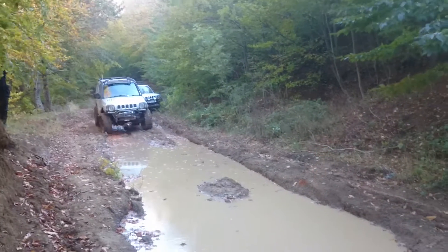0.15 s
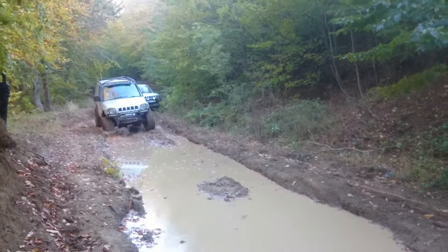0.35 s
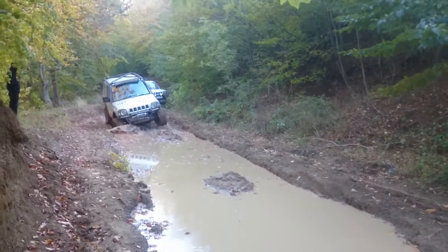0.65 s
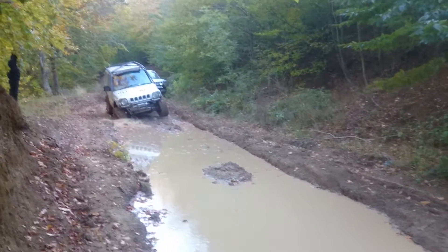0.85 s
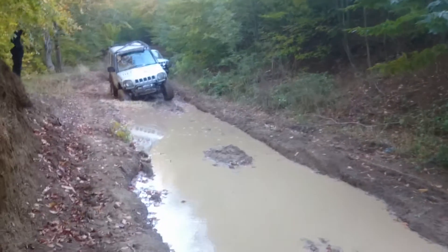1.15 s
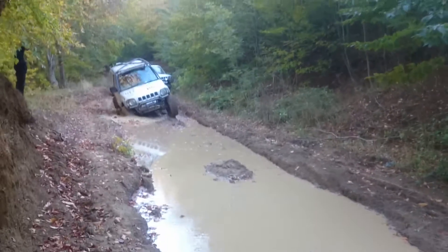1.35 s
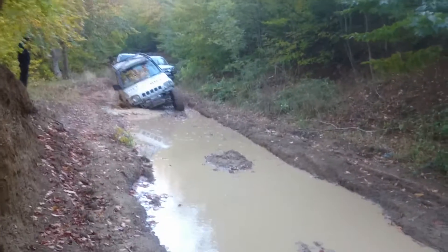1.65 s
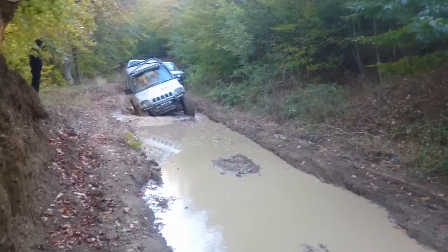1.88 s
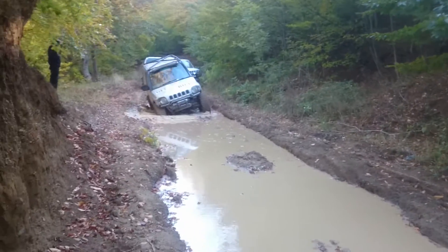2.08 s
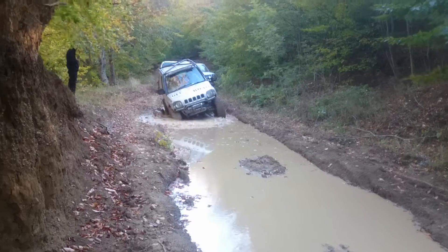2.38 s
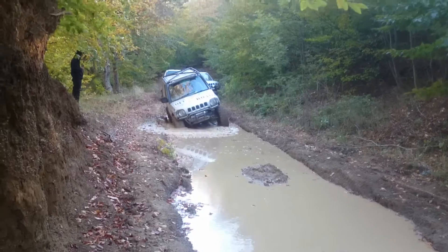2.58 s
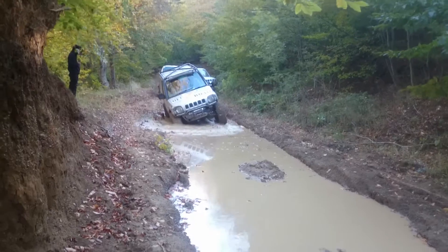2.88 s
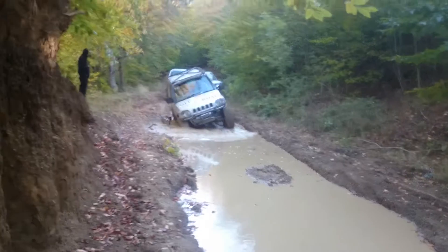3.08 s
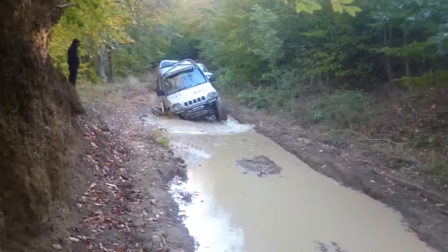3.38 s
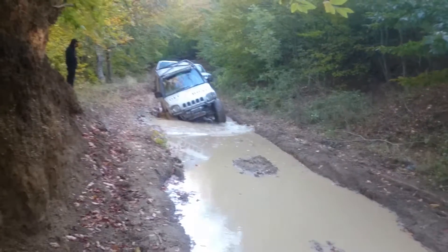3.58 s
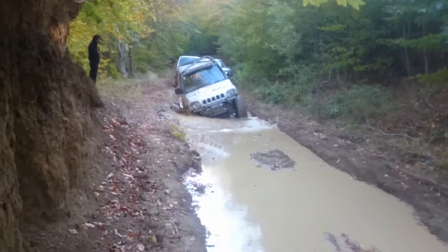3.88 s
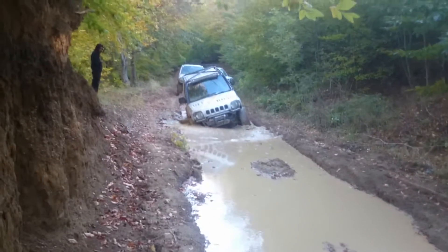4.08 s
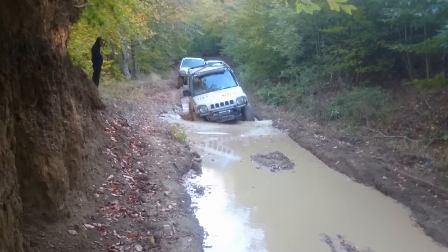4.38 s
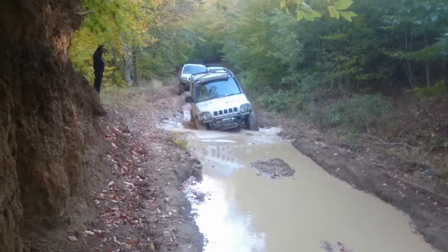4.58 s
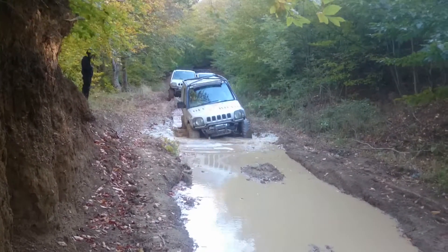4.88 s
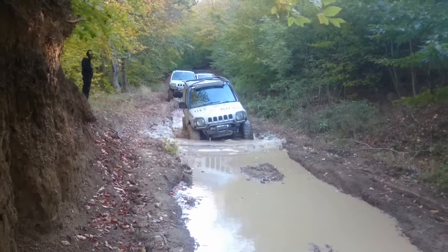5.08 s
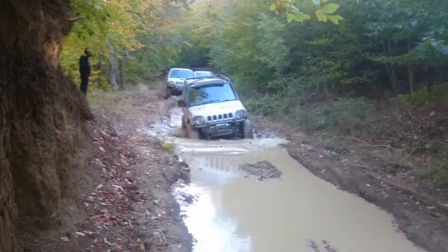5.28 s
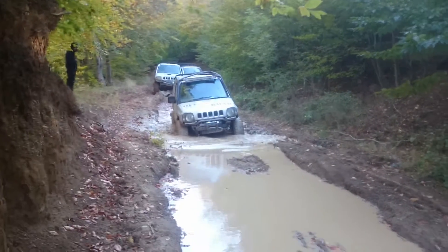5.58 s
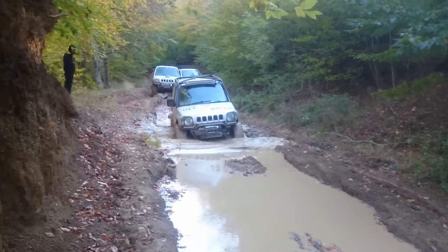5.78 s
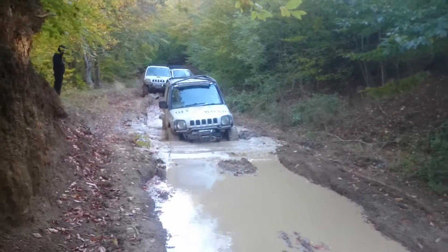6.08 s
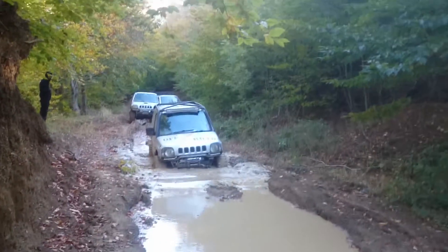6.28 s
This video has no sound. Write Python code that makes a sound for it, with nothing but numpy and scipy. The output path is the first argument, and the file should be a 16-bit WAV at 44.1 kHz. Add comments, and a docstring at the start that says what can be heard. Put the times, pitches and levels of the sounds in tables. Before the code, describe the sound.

Brittle leaves crunch under a foot close to the microphone as an off-road vehicle burbles farther along a woodland track. Its engine revs once, sinks, then climbs again and settles into a deep, throbbing drone. The tyres churn through a deep puddle, with gulping water, hissing spray, ticking drops and occasional knocks from the ruts. The sloshing grows a little louder towards the end.

```python
"""An exhaust booms on a forest track: one blip of the throttle, then a steady pull as a small
four-wheel drive creeps into a deep muddy puddle. Its firing pulses slide through the resonances of
the pipe, water sloshes and sprays round the tyres, and the chassis knocks in the ruts.
Early on, dry leaves crunch underfoot right beside the stereo microphone."""
import sys
import numpy as np
from scipy import signal
from scipy.fft import rfft, irfft, next_fast_len
from scipy.io import wavfile
from scipy.ndimage import uniform_filter1d

SR = 44100
rng = np.random.default_rng(int(sys.argv[2]) if len(sys.argv) > 2 else 0)


def inscribe(sig):
    """Save sig as 16-bit PCM at rate SR to the path in sys.argv[1].

    A 1-D sig is mono; a 2-D sig holds one channel per row.
    Samples are clipped to [-1, 1] before scaling.
    """
    pcm = np.round(np.clip(np.atleast_2d(sig).T, -1, 1) * 32767)
    wavfile.write(sys.argv[1], SR, pcm.astype(np.int16))


N = 284445
TIME = np.arange(N) / SR

# response of the exhaust pipe and silencer: (frequency [Hz], gain [dB])
PIPE_RESPONSE = [(25, -48), (55, -9), (90, -7.5), (122, -4), (150, -7), (195, -13), (235, -12), (305, -18),
                 (348, -47), (400, -26), (520, -51), (800, -73)]


def from_db(db):
    return 10 ** (np.asarray(db) / 20)


def rms_one(x):
    return x / np.sqrt(np.mean(x ** 2) + 1e-20)


def hiss():
    return rng.standard_normal((2, N))


def in_time(rows):
    """Each column of a curve, sample by sample."""
    times, *columns = np.transpose(rows)
    return [np.interp(TIME, times, column) for column in columns]


def held(moves, lag_s):
    """Each column holds from one move to the next, softened by two lags in series."""
    times, *columns = np.transpose(moves)
    latest = np.maximum(np.searchsorted(times, TIME, side="right") - 1, 0)
    r = np.exp(-1 / (lag_s * SR))
    return [c[0] + signal.lfilter([(1 - r) ** 2], [1, -2 * r, r * r], c[latest] - c[0]) for c in columns]


def swells(events):
    """An envelope that rises and falls smoothly round each event."""
    return sum(from_db(db) * np.exp(-((TIME - s) / half_s) ** 2) for s, half_s, db in events)


def push(start_s, rise_s, decay_s):
    """An envelope with a straight rise to 1 and a dying tail."""
    age = TIME - start_s
    return np.clip(age / rise_s, 0, 1) * np.exp(-np.maximum(age - rise_s, 0) / decay_s)


def bursts(events, decay_s):
    """An envelope that jumps at each event and dies away."""
    jumps = np.zeros(N)
    for s, db in events:
        jumps[round(s * SR)] += from_db(db)
    return signal.lfilter([1], [1, -np.exp(-1 / (decay_s * SR))], jumps + 1e-18)


def drift(rate_hz):
    """A slow random wander with a spread of 1."""
    hop = 40
    r = np.exp(-2 * np.pi * rate_hz * hop / SR)
    slow = signal.lfilter([1], [1, -2 * r, r * r], rng.standard_normal(N // hop + 2002))[2000:]
    return np.interp(np.arange(N) / hop, np.arange(len(slow)), rms_one(slow))


def grains(per_s, spread_db):
    """Two rows of random clicks of unequal size, at the same moments."""
    sizes = from_db(spread_db * np.minimum(rng.exponential(1, N), 4))
    hits = rng.random(N) < per_s / SR
    return rms_one(hits * sizes * hiss())


def at_hz(spectrum, hz):
    """Reads a spectrum on a log-frequency axis."""
    points_hz, values = np.transpose(spectrum)
    return np.interp(np.log(hz + 1e-3), np.log(points_hz), values)


def colour(x, spectrum):
    """Filters by a spectrum of (frequency [Hz], gain [dB])."""
    size = next_fast_len(N + 8192)
    hz = np.arange(size // 2 + 1) * SR / size
    return irfft(rfft(x, size) * from_db(at_hz(spectrum, hz)), size)[..., :N]


def resonate(x, hz, width_hz):
    """One resonance with a gain of 1 at its top."""
    r = np.exp(-np.pi * width_hz / SR)
    feedback = [1, -2 * r * np.cos(2 * np.pi * hz / SR), r * r]
    return signal.lfilter(np.array([1, 0, -1]) * (1 - r * r) / 2, feedback, x + 1e-18)


def spread(pair, spectrum):
    """Turns two unrelated signals into coloured stereo, alike in the bass and diffuse in the treble."""
    # likeness at the two microphones: (frequency [Hz], correlation [0-1])
    likeness = [(100, 0.6), (600, 0.96), (1100, 0.64), (2000, 0.0039), (5000, 0.0071), (16000, 0.027)]
    mid = colour(pair[0], [(hz, 10 * np.log10(1 + alike)) for hz, alike in likeness])
    side = colour(pair[1], [(hz, 10 * np.log10(1 - alike)) for hz, alike in likeness])
    return rms_one(colour(np.array([mid + side, mid - side]), spectrum))


def valve_clatter(firings):
    """The valve gear rattles the block once a firing."""
    # modes of the engine block and cover: (frequency [Hz], width [Hz], gain [dB])
    block_modes = [(1173, 220, -2.5), (1630, 63, 4.5), (2040, 103, 4), (3428, 33, 8.5)]
    # strength of the clatter: (time [s], level [dB])
    levels = [(0, -77), (1, -51.5), (2.8, -49), (6.45, -55.5)]
    rattle = hiss() * (1 + np.cos(2 * np.pi * firings))
    ringing = sum(from_db(db) * resonate(rattle, hz, width) for hz, width, db in block_modes)
    return from_db(in_time(levels)[0]) * rms_one(ringing)


def tyre_scrub():
    """Grit under a slipping tyre rasps in a narrow band."""
    # tyre slips: (middle [s], half length [s], level [dB])
    slips = [(.28, 0.068, -41.5), (.92, .13, -45), (3.95, 0.23, -46.5)]
    flutter = from_db(2 * drift(20))
    return swells(slips) * flutter * rms_one(resonate(hiss(), hz=2030, width_hz=480))


def ticks_and_splats():
    """Drops and grit land with a sharp tick; splats are longer and duller."""
    # flung drops and grit: (time [s], relative level [dB])
    drops = [(0.0782, -32), (1.4444, -28.5), (1.7851, -26), (2.1038, -28.5), (2.139, -29.5), (2.8992, -33),
             (3.2748, -33), (3.7295, -38), (6.3594, -28)]
    # muddy water landing: (time [s], relative level [dB])
    mud = [(3.865, -42), (6.139, -34), (6.167, -37), (6.179, -41), (6.288, -34.5)]
    tick_noise = spread(hiss(), [(800, -3), (3000, 1), (5000, -2), (15000, -2)])
    splat_noise = spread(hiss(), [(1500, -32), (4700, 8), (9000, -14)])
    ticks = from_db(-3) * bursts(drops, decay_s=0.0025) * tick_noise
    splats = from_db(3) * bursts(mud, decay_s=0.0054) * splat_noise
    return ticks + splats


def chassis_knocks():
    """A sharp blow and a brief rattle ring the damped chassis."""
    # knocks and thumps; the first four fall with the footsteps in the leaves: (time [s], relative level [dB])
    knocks = [(.528, -20.5), (.557, -21), (.586, -24), (.686, -30), (1.504, -33), (1.72, -23.5),
              (2.228, -20), (3.652, -26), (3.785, -33), (5.455, -28)]
    # modes of the chassis: (frequency [Hz], width [Hz], gain [dB])
    modes = [(200, 170, 3), (400, 300, -1), (720, 450, -7), (1300, 900, -9), (3000, 3000, -14)]
    rattle = from_db(-7) * bursts(knocks, decay_s=0.005) * rng.standard_normal(N)
    blows = bursts(knocks, decay_s=0.0004) + rattle
    return from_db(6.5) * sum(from_db(db) * resonate(blows, hz, width) for hz, width, db in modes)


def slosh(churn_db):
    """Bubbles gulp in the puddle, louder as the bow wave nears the microphone."""
    # colour of the slosh: (frequency [Hz], gain [dB])
    spectrum = [(200, -15), (340, -9), (420, -3.5), (520, -6), (670, 0), (790, -4), (920, -11.5),
                (1150, -2.5), (1500, -19.5)]
    rise_db_per_s = 0.7051
    level_db = churn_db - 7.5 + rise_db_per_s * TIME
    bubble_hz = np.geomspace(380, 1300, num=12)
    bubbles = rms_one(sum(resonate(grains(per_s=40, spread_db=2), hz, hz / 10) for hz in bubble_hz))
    return spread(bubbles + from_db(13) * hiss(), spectrum) * from_db(level_db + 1.7 * drift(7.3))


def wash_and_spray(churn_db):
    """A wash of bursting foam and a fine spray with single drops surge together round the tyres."""
    # colour of the foam: (frequency [Hz], gain [dB])
    wash_spectrum = [(600, -1), (920, -1), (1150, 0), (1400, 0.5), (1620, 6), (1820, 2.5), (2050, 2),
                     (2350, 1), (3450, 1), (3800, 0), (5200, 0.5), (6400, -7), (9000, -20.5), (14000, -18)]
    # colour of the spray: (frequency [Hz], gain [dB])
    spray_spectrum = [(4000, 3), (7000, 9), (8800, 0), (10400, 2), (12500, -7), (15000, 5)]
    surge = drift(38)
    wash = spread(grains(per_s=1200, spread_db=2.5) + from_db(11) * hiss(), wash_spectrum)
    wash_db = churn_db - 3.5 + 0.71 * surge + drift(17.6)
    spray = spread(grains(per_s=45, spread_db=10) + from_db(12) * hiss(), spray_spectrum)
    spray_db = -56 + 2.5 * (churn_db - churn_db.mean()) + 3.16 * surge
    return wash * from_db(wash_db) + spray * from_db(spray_db)


def puddle():
    """The tyres churn the water, and mist hisses up as the bow wave breaks."""
    # how hard the tyres churn: (time [s], relative level [dB])
    churn = [(.18, -44), (.9, -37), (1.65, -38), (2.42, -38), (2.49, -41.5), (3.3, -40.5), (5.1, -39),
             (5.8, -37), (6.45, -37.5)]
    # puffs of mist: (middle [s], half length [s], level [dB])
    puffs = [(1.55, 0.25, -42.5), (3.3, 0.069, -50), (5.82, .17, -41.5), (6.27, 0.13, -42.5)]
    churn_db, = in_time(churn)
    water = slosh(churn_db) + wash_and_spray(churn_db)
    mist = swells(puffs) * spread(hiss(), [(8000, -4), (15000, -8)])
    return water + mist


def leaves():
    """Right beside the microphone a foot snaps and crushes brittle leaves, which then settle."""
    # pushes of the foot: (time [s], snap level [dB], crush level [dB])
    crunches = [(0.522, -28, -28.5), (.576, -23, -34), (0.684, -22, -30.5)]
    # colour of dry leaves close up: (frequency [Hz], gain [dB])
    spectrum = [(30, -8), (60, 19), (100, 12), (250, -4), (750, 1.5), (1000, -5), (2100, -0.5), (2700, 7.5),
                (4200, 8.5), (6000, 2.5), (8000, -6.5), (12500, -8.5), (15500, -12)]
    pressure = from_db(-41) * push(0.22, rise_s=0.038, decay_s=0.26)   # the foot first brushes them
    for s, snap_db, crush_db in crunches:
        snap = push(s, rise_s=0.002, decay_s=0.012)
        crush = push(s, rise_s=0.028, decay_s=0.048)
        settle = from_db(-13.5) * push(s, rise_s=0.25, decay_s=0.068)
        pressure += from_db(snap_db) * snap + from_db(crush_db) * (crush + settle)
    return pressure * spread(grains(per_s=2400, spread_db=1.7) + from_db(6) * hiss(), spectrum)


def burble(firings, top_hz=372):
    """No two firings are equally strong: each surplus thumps the pipe and comes back from the banks."""
    fired = np.diff(np.floor(firings), prepend=0)
    direct = rms_one(colour(fired * rng.uniform(-0.4, 1, N), PIPE_RESPONSE))
    banks = from_db(1) * rms_one(colour(hiss(), PIPE_RESPONSE))   # diffuse, so played as noise
    return signal.sosfilt(signal.butter(2, top_hz, fs=SR, output="sos"), direct + banks)


def exhaust(firing_hz, firings, throttle, thud_db, burble_db):
    """Harmonics of the firing pulses grow with the throttle and slide through the pipe's resonances."""
    # the bark; halves come from unequal cylinders: (multiple [x firing rate], relative level [dB])
    overtones = [(2.5, -4), (3, 3.5), (3.5, -16), (4, -2.5), (4.5, -19), (5, -4), (6, -7)]
    # the upper overtones dull as the tailpipe sinks towards the water: (time [s], lift [dB])
    brightness = [(0, 12), (1.2, 4), (2.7, -0.5), (3.6, 3.5), (4.4, 1.5), (6.45, 0.5)]
    pipe_hz, pipe_q = 122, 1.33

    def tone(multiple, db):
        ratio = multiple * firing_hz / pipe_hz
        lag = np.arctan(pipe_q * (ratio - 1 / ratio))   # tones above the main resonance come late
        offset = 0.43 * rng.uniform(-1.09, 0.89)
        return np.sqrt(2) * from_db(db) * np.cos(2 * np.pi * (multiple * firings + offset) - lag)

    shut = 1 - np.clip(throttle, 0, 1)
    climb_hz_per_s = uniform_filter1d(np.maximum(np.gradient(firing_hz) * SR, 0), size=4000)
    boom_db = -11 - 22.5 * shut + at_hz(PIPE_RESPONSE, 2 * firing_hz)
    bark_db = -23.5 - 11 * shut + 0.044 * climb_hz_per_s   # hardens while the engine gathers speed
    lift_db = in_time(brightness)[0] - 11.5 * shut
    thud = tone(0.96, thud_db)
    boom = tone(2, boom_db + 0.3 * drift(19))
    throb = tone(1.5, burble_db - 2.5)   # unequal cylinders
    bark = np.zeros(N)
    for multiple, db in overtones:
        is_upper = multiple >= 4
        level_db = bark_db + db + is_upper * lift_db + at_hz(PIPE_RESPONSE, multiple * firing_hz)
        bark += tone(multiple, level_db + 1.2 * drift(7))
    return thud + boom + throb + bark


def scene():
    """Engine and wheels out in the puddle, leaves close by."""
    # engine speed: (time [s], firing rate [Hz])
    speed = [(0.0, 58), (0.11, 53), (0.32, 50.6), (0.79, 39.5), (0.92, 43.2), (1.13, 58), (1.27, 61.5),
             (1.62, 52), (1.78, 48), (1.96, 31.8), (2.1, 30.0), (2.19, 30.3), (2.28, 46.4), (2.35, 52.5),
             (2.43, 60), (2.55, 68.4), (2.8, 74.5), (3.03, 75.8), (3.36, 67.2), (4.28, 64.2), (5.12, 62.7),
             (5.46, 68.7), (5.93, 69.8), (6.27, 69), (6.45, 65)]
    # the driver moves the pedal and holds it: (time [s], throttle [0-1], thud [dB], burble [dB])
    pedal = [(0, 0.7, -52, -39), (.1, .25, -43.5, -38.5), (.87, 0.95, -32, -30.5), (1.1, 0.91, -35, -30),
             (1.53, 0.12, -61, -39.5), (2.205, 1, -27.5, -37), (2.55, 0.89, -33.5, -31),
             (3.15, 1, -31.5, -36), (3.85, 0.99, -32, -41), (5.24, 1, -25, -34.5)]
    firing_hz, = in_time(speed)
    throttle, thud_db, burble_db = held(pedal, lag_s=0.037)
    firings = np.cumsum(firing_hz) / SR
    tailpipe = exhaust(firing_hz, firings, throttle, thud_db, burble_db)
    engine = tailpipe + from_db(burble_db + 0.5) * burble(firings) + valve_clatter(firings)
    wheels = puddle() + tyre_scrub() + chassis_knocks() + ticks_and_splats()
    return engine + wheels + leaves()


def record(dry):
    """The microphone ports ring in the treble; the left is weaker, the right later; the top is cut."""
    # the left microphone against the right: (frequency [Hz], gain [dB])
    left_response = [(100, -6.5), (400, -6), (700, -5), (1290, -1.5), (2500, -4.5), (4400, -1), (6000, -4),
                     (8000, 0), (10400, 3), (12000, -3), (14000, -19)]
    right_lag_s, gain_db, cutoff_hz = 0.00028, 2.5, 15900
    port_ring = from_db(7) * resonate(dry, hz=4846, width_hz=895)
    left, right = dry + port_ring
    right = np.interp(np.arange(N) - round(right_lag_s * SR), np.arange(N), right)
    pair = from_db(gain_db) * np.array([colour(left, left_response), right])
    return signal.sosfilt(signal.ellip(12, 0.1, 90, cutoff_hz, fs=SR, output="sos"), pair)


dry = scene()
out = record(dry)
inscribe(out)
```